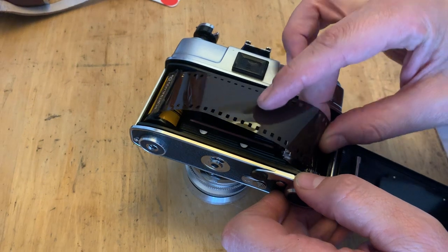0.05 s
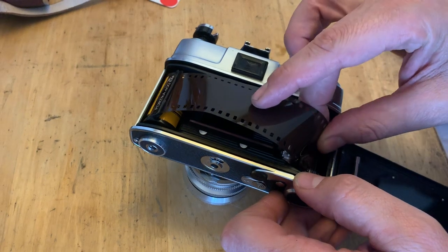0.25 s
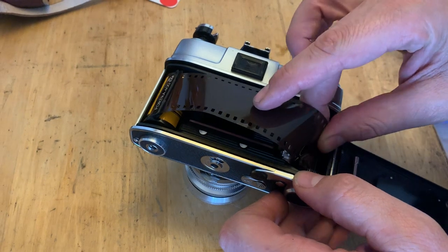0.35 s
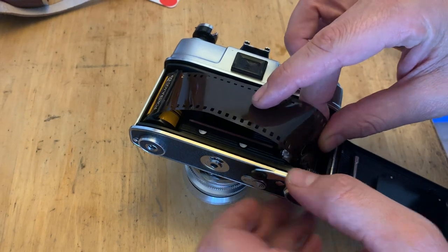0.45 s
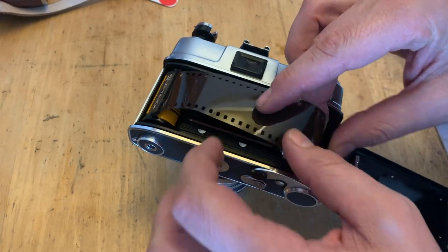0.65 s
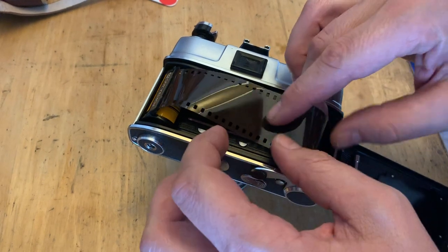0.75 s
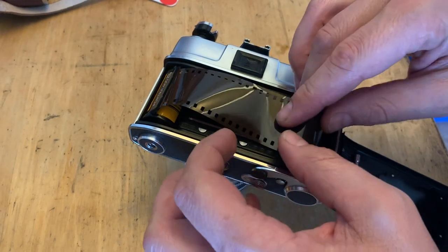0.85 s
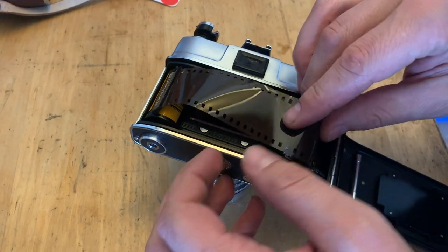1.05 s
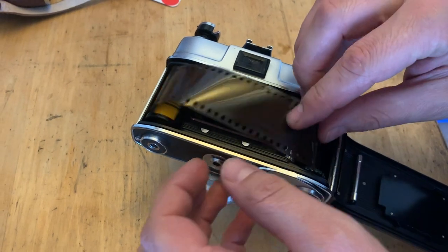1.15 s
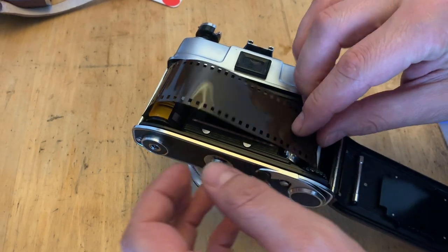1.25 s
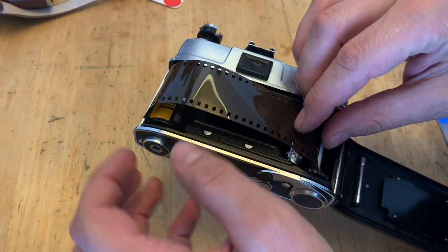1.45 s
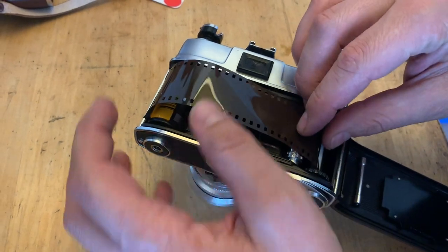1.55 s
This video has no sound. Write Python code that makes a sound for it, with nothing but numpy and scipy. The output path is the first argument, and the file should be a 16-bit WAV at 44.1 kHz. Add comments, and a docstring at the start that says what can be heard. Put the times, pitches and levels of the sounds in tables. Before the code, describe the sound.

Film being wound in an open camera, with two sharp snaps and small gear ticks.

```python
"""Film is wound on in an open camera lying on a wooden table, close to the microphone in a small quiet room.
Twice the film's perforations snap over the sprocket teeth; the winding gear ticks and rattles,
the film rustles as it is dragged along, and the hands bump the camera body. A low hum lies underneath."""
import sys
import numpy as np
from scipy import signal
from scipy.fft import rfft, irfft
from scipy.io import wavfile

SR = 44100
rng = np.random.default_rng(int(sys.argv[2]) if len(sys.argv) > 2 else 0)


def inscribe(sig):
    """Save sig as 16-bit PCM at rate SR to the path in sys.argv[1].

    A 1-D sig is mono; a 2-D sig holds one channel per row.
    Samples are clipped to [-1, 1] before scaling.
    """
    pcm = np.round(np.clip(np.atleast_2d(sig).T, -1, 1) * 32767)
    wavfile.write(sys.argv[1], SR, pcm.astype(np.int16))


N = 70560
SIZE = 4096  # samples in one impact
HZ = np.fft.rfftfreq(SIZE, 1 / SR)


def amp(db):
    """Decibels to gain."""
    return 10 ** (np.asarray(db) / 20)


def unit(x):
    """Scales to an rms of 1."""
    return x / np.sqrt(np.mean(abs(x) ** 2) + 1e-20)


def decay(t, t60):
    """A fade that loses 60 dB every t60 seconds."""
    return np.exp(-np.log(1000) * t / t60)


def read(points, hz):
    """Reads an EQ curve on a log-frequency axis."""
    f, value = np.transpose(points)
    return np.interp(np.log(hz + 1), np.log(f + 1), value)


def add(mix, s, sound):
    """Adds a stereo sound at s seconds."""
    part = mix[:, max(round(s * SR), 0):][:, :sound.shape[1]]
    part += sound[:, :part.shape[1]]


def causal(gain):
    """The most compact impulse response that has this spectrum."""
    log = np.log(np.maximum(np.r_[gain, gain[-2:0:-1]], 1e-5))
    return irfft(np.exp(np.conj(signal.hilbert(log)))[:len(gain)], SIZE)


def shaped(x, points):
    """Colours a sound with an EQ curve."""
    n = x.shape[-1]
    return irfft(rfft(x) * amp(read(points, np.fft.rfftfreq(n, 1 / SR))), n)


def ports(pair, lag_ms):
    """Two microphone ports: a positive lag reaches the left one later."""
    n = pair.shape[-1]
    delay = np.maximum([[lag_ms], [-lag_ms]], 0) / 1000
    return irfft(rfft(pair) * np.exp(-2j * np.pi * np.fft.rfftfreq(n, 1 / SR) * delay), n)


def spread(three, width):
    """A stereo pair from one shared and two separate signals."""
    return (three[0] + width * three[1:]) / np.sqrt(1 + width ** 2)


def treble(db, corner_hz=5700):
    """A shelf that lifts or dulls the top."""
    return amp(db / (1 + (corner_hz / (HZ + 1)) ** 4))


def impact(gain, chatter_db, chatter_s, lag_ms):
    """One contact and a quickly dying chatter after it, ringing with the given spectrum."""
    t = np.arange(SIZE) / SR
    envelope = np.exp(-t / chatter_s) * (1 - np.exp(-t / 0.0009))
    blow = amp(chatter_db) * unit(rng.standard_normal((2, SIZE)) * envelope) / np.sqrt(SIZE)
    blow[:, 0] += 1  # the contact itself
    sound = signal.fftconvolve(blow, causal(unit(gain))[None], axes=1)[:, :SIZE]
    return ports(unit(sound) / np.sqrt(SIZE), lag_ms)


# Bass-heavy room tone. Each row: frequency in Hz, gain in dB.
ROOM_TONE_EQ = [(20, 0), (35, -6), (60, -7), (85, -19), (140, -20), (260, -25), (450, -37), (1000, -43),
                (2500, -45), (6000, -50), (16000, -49)]

def background(tone_db=-58, hum_db=-60, hum_hz=50.47):
    """Room rumble, faint hiss and a low hum."""
    hum = np.sqrt(2) * np.sin(2 * np.pi * (hum_hz * np.arange(N) / SR + rng.random()))
    tone = shaped(spread(rng.standard_normal((3, N)), width=0.33), ROOM_TONE_EQ)
    return amp(tone_db) * unit(tone) + amp(hum_db) * hum


# Fader ride of the finger noise. Each row: time in seconds, level in dB.
HANDLING_LEVEL = [(0, -67), (.2, -81.5), (.4, -83), (.6, -87.5), (.75, -64), (.95, -72.5), (1.15, -62),
                  (1.35, -68), (1.449, -67), (1.6, -71)]
# Its muffled colour. Each row: frequency in Hz, gain in dB.
HANDLING_EQ = [(40, 2), (100, -10.5), (150, 0.5), (200, 4), (248, 6.5), (300, -4.5), (350, -13),
               (420, -8.5), (520, -15), (1200, -27.5), (2300, -10)]

def handling(top_hz=2600):
    """Dull rumble of fingers shifting on the camera."""
    level = amp(np.interp(np.arange(N) / SR, *np.transpose(HANDLING_LEVEL)))
    rumble = shaped(spread(rng.standard_normal((3, N)), width=0.62), HANDLING_EQ)
    lowpass = signal.butter(2, top_hz, fs=SR, output="sos")
    return level * unit(signal.sosfilt(lowpass, rumble))


# Pulls on the film. Each row: start, peak and end in seconds, level in dB, treble in dB.
FILM_PULLS = [(0.13, 0.186, 0.34, -57, 3), (0.72, 0.719, 1.03, -60.5, -9), (.865, .905, .97, -55, 4),
              (0.881, 0.941, 0.97, -53.5, -1), (1.155, 1.209, 1.293, -47, 7.5),
              (1.251, 1.266, 1.318, -36, 11), (1.28, 1.312, 1.363, -39, -6.5),
              (1.31, 1.334, 1.527, -51.5, -2)]
# Colour of the rustle. Each row: frequency in Hz, gain in dB.
RUSTLE_EQ = [(100, -16.5), (300, -2), (500, -3.5), (900, 1.5), (1350, 4), (1800, -0.5), (2400, 6.5),
             (3300, 0), (5000, 7), (6800, -8), (9000, -7.5), (12000, -7.5), (15500, -11)]

def film_rustle(slips_per_s=1800, slip_spread_db=4.5, hiss=.35, fade_db=23):
    """Film rubs over the rails: dense tiny slips and hiss that swell and fade with each pull."""
    out, t = np.zeros((2, N)), np.arange(N) / SR
    for start, peak, end, db, treble_db in FILM_PULLS:
        slips = (rng.random((3, N)) < slips_per_s / SR) * rng.choice([-1, 1], (3, N))
        strength = amp(slip_spread_db * np.minimum(rng.exponential(1, (3, N)), 4))
        friction = unit(slips * strength) + hiss * rng.standard_normal((3, N))
        rub = ports(spread(friction, width=0.83), lag_ms=-.1)
        colour = causal(amp(read(RUSTLE_EQ, HZ)) * treble(treble_db))
        rustle = signal.oaconvolve(rub, colour[None], axes=1)[:, :N]
        from_peak = np.maximum((peak - t) / max(peak - start, .002), (t - peak) / max(end - peak, .002))
        out += unit(rustle) * amp(db - fade_db * np.minimum(from_peak, 10) ** 1.3)
    return out


# Ticks of the winding gear. Each row: start in seconds, level in dB, favoured ring in Hz,
# treble in dB, rattle decay in seconds.
GEAR_TICKS = [(0.158, -38, 1080, -7, 0.0024), (0.1924, -20, 1220, -12, 0.0024),
              (0.6714, -33.5, 1206, -4, 0.0042), (.6798, -27, 2330, 0, .002),
              (0.6837, -26.5, 2360, 6, 0.0032), (0.6948, -23, 2420, 11, 0.00065),
              (0.7328, -19, 2250, -3.5, 0.0029), (0.7376, -12.5, 2250, -2.5, .0008),
              (.7380, -16, 840, 4.5, 0.0014), (0.8044, -23.5, 9700, 20, 0.00092),
              (0.8085, -19.5, 3670, -17, .0011), (1.0714, -34.5, 1404, -8.5, 0.0019),
              (1.2145, -27, 2530, 13, .004), (1.2705, -8, 3410, 16.5, .0012),
              (1.31, -12.5, 4000, 6.5, 0.0018), (1.3234, -10.5, 8300, 10, 0.0016),
              (1.3265, -11.5, 3430, 2, 0.0045), (1.3309, -9, 5860, 10.5, 0.0015),
              (1.3457, -17.5, 2512, -7, 0.0036), (1.3998, -29, 4300, -7, 0.0012)]
# Resonances of the camera body. Each row: frequency in Hz, width in Hz, level in dB.
BODY_MODES = [(650, 250, -11.5), (1244, 160, -1.5), (2460, 310, -5), (3100, 350, -10), (4300, 300, -6.5),
              (5886, 1300, -12), (8500, 510, -17.5), (10700, 900, -19.5), (12000, 600, -15.5),
              (14500, 1200, -16)]

def gear_ticks(boost_db=13.5, boost_octaves=0.29):
    """Gear and lever knock the body; each contact favours one part of its ring."""
    out = np.zeros((2, N))
    body = np.sqrt(sum(amp(db) ** 2 / (1 + ((HZ ** 2 - hz ** 2) / (width * (HZ + 1))) ** 2)
                       for hz, width, db in BODY_MODES))
    for s, db, hz, treble_db, rattle_s in GEAR_TICKS:
        boost = amp(boost_db * np.exp(-.5 * (np.log2((HZ + 1) / hz) / boost_octaves) ** 2))
        colour = body * boost * treble(treble_db)
        add(out, s, amp(db) * impact(colour, chatter_db=2, chatter_s=rattle_s, lag_ms=-0.08))
    return out


# Soft thumps of the camera on the table. Each row: start in seconds, level in dB.
TABLE_BUMPS = [(.170, -35), (0.197, -21), (0.736, -42), (0.811, -31), (0.928, -37.5), (1.072, -47),
               (1.15, -40), (1.304, -20.5), (1.332, -21), (1.384, -26)]
# Low ring of the wood. Each row: frequency in Hz, 60 dB decay in seconds, level in dB.
WOOD_MODES = [(145, 0.034, -5), (179, 0.041, -1.5), (239, 0.18, 6.5), (397, .08, -6)]

def table_bumps():
    """The camera presses on the table, which answers with a few low modes."""
    out, t = np.zeros((2, N)), np.arange(2 * SIZE) / SR
    ring = sum(amp(db) * decay(t, t60) * np.sin(2 * np.pi * hz * t) for hz, t60, db in WOOD_MODES)
    for s, db in TABLE_BUMPS:
        add(out, s, -amp(db) * unit(ring)[None] / np.sqrt(len(t)))
    return out


# Two double snaps, soft then hard. Each row: start in seconds, level in dB, ring in Hz,
# ring width in Hz, crack against the ring in dB.
FILM_SNAPS = [(0.2031, -18, 14500, 2445, -3), (0.2255, 6.5, 15200, 1500, -7),
              (1.2369, -16.5, 14000, 3024, 3.5), (1.2654, 5.5, 10400, 2400, -4.5)]
# Bright colour of the crack. Each row: frequency in Hz, gain in dB.
CRACK_EQ = [(200, -23.5), (700, -15), (1250, -6.5), (1800, -14.5), (2500, -4.5), (3200, 3.5), (3900, -10),
            (5500, -9), (7000, -10), (8300, 3.5), (11000, -2), (13500, 6), (16000, 2)]

def film_snaps(ring_send_db=-14, chatter_s=0.00071):
    """Taut film lets go of a tooth: a broad crack and a short high ring. Returns direct and room send."""
    direct, send = np.zeros((2, 2, N))
    for s, db, hz, width, crack_db in FILM_SNAPS:
        ring = unit(1 / (1 + ((HZ - hz) / width * 2) ** 2))
        crack = amp(crack_db) * unit(amp(read(CRACK_EQ, HZ)))
        add(direct, s, amp(db) * impact(np.hypot(ring, crack), 0, chatter_s, lag_ms=0.23))
        # The high ring beams at the microphone; little of it reaches the walls.
        off_axis = np.hypot(amp(ring_send_db) * ring, crack)
        add(send, s, amp(db + crack_db) * impact(off_axis, 0, chatter_s, lag_ms=0))
    return direct, send


# Reverb time of the small room. Each row: frequency in Hz, 60 dB decay in seconds.
REVERB_TIMES = [(200, 0.22), (1000, 0.15), (3200, 0.34), (8000, .26), (15000, 0.17)]
# Colour of the reverb. Each row: frequency in Hz, gain in dB.
REVERB_EQ = [(200, -4.5), (1200, 0.5), (3200, -6), (5500, -2.5), (8000, -8.5), (11000, -4.5), (15500, -12)]

def room(send):
    """A short diffuse stereo tail fed by the send's right channel, each band dying at its own speed."""
    n = SR // 2
    hz, t, bands = signal.stft(spread(rng.standard_normal((3, n)), width=.9), SR, nperseg=256)
    t60 = read(REVERB_TIMES, hz)[:, None]
    equal_energy = np.sqrt(2 * np.log(1000) / (t60 * SR))
    bands = bands * decay(t, t60) * amp(read(REVERB_EQ, hz))[:, None] * equal_energy
    fade_in = np.minimum(np.arange(n) / SR / 0.002, 1)
    tail = signal.istft(bands, SR, nperseg=256)[1][:, :n] * fade_in
    return signal.fftconvolve(send[1:], tail, axes=1)[:, :N]


# Ring of plates and springs. Each row: frequency in Hz, 60 dB decay in seconds, resonant gain in dB.
METAL_MODES = [(1179, 0.054, -6.5), (2167, .04, -5.5), (3190, 0.018, -4.5), (3295, 0.24, 2.5),
               (4750, .08, -3), (5700, .1, 2), (8080, .1, -2), (8715, .09, -1)]

def metal_ring(x):
    """Adds thin metal parts ringing on in sympathy."""
    t = np.arange(SIZE) / SR
    ring = sum(amp(db) * 2 * np.log(1000) / (t60 * SR) * decay(t, t60) * np.cos(2 * np.pi * hz * t)
               for hz, t60, db in METAL_MODES)
    return x + signal.oaconvolve(x, ring[None], axes=1)[:, :N]


def scene(gear_send_db=-8, film_send_db=-10):
    """The camera's sounds, their room and the background."""
    snaps, snap_send = film_snaps()
    gear, film, bumps = gear_ticks(), film_rustle(), table_bumps()
    walls = room(snap_send + amp(gear_send_db) * gear + amp(film_send_db) * film + bumps)
    return metal_ring(snaps + gear + film + walls) + bumps + handling() + background()


# Stereo lean of the microphones. Each row: frequency in Hz, left minus right in dB.
STEREO_LEAN = [(150, -1), (500, 1), (1100, 3), (2300, 2), (4500, -1.5), (8000, -0.5)]

def record(dry, shared_above_hz=7040, top_hz=16100):
    """The band-limited microphone pair leans left in the mids and shares its treble, late on the left."""
    hz = np.fft.rfftfreq(N, 1 / SR)
    left, right = rfft(dry)
    own = 1 / np.sqrt(1 + (hz / shared_above_hz) ** 12)
    late_right = rfft(ports(dry[[1, 1]], lag_ms=0.2588))[0]
    left = own * left + np.sqrt(1 - own ** 2) * late_right
    balance = amp(np.outer([.5, -.5], read(STEREO_LEAN, hz)))
    pair = irfft(np.array([left, right]) * balance, N)
    lowpass = signal.firwin(151, top_hz, window=("kaiser", 9), fs=SR)
    return signal.oaconvolve(pair, lowpass[None], "same")


dry = scene()
out = record(dry)
inscribe(out)
```